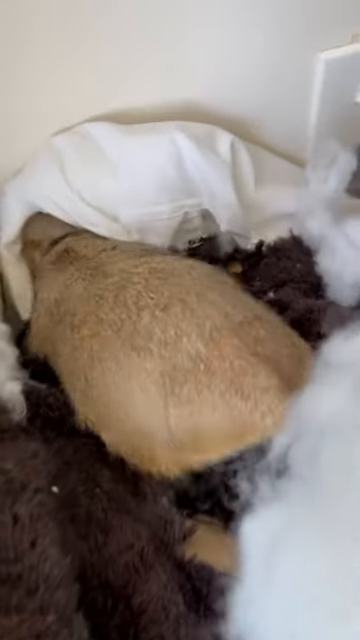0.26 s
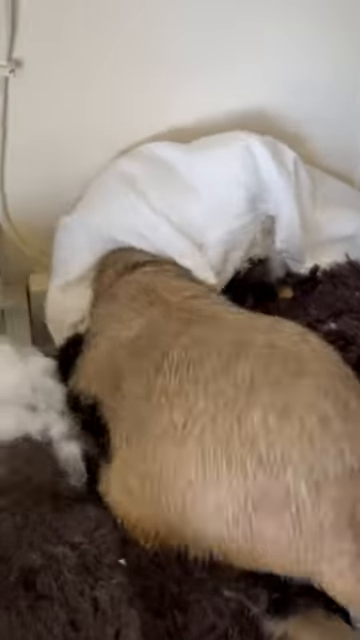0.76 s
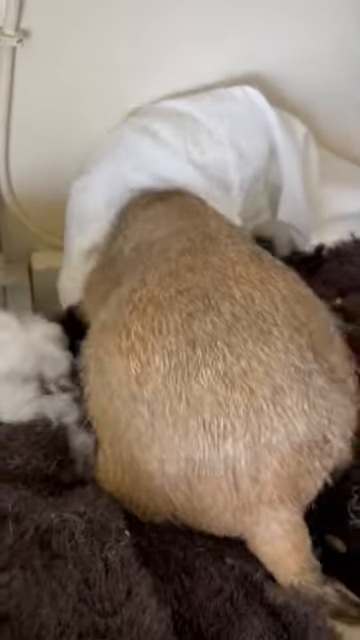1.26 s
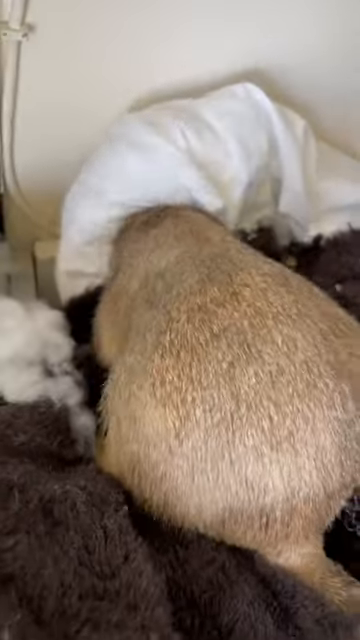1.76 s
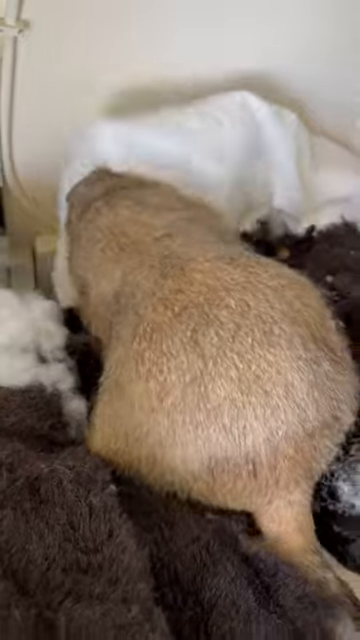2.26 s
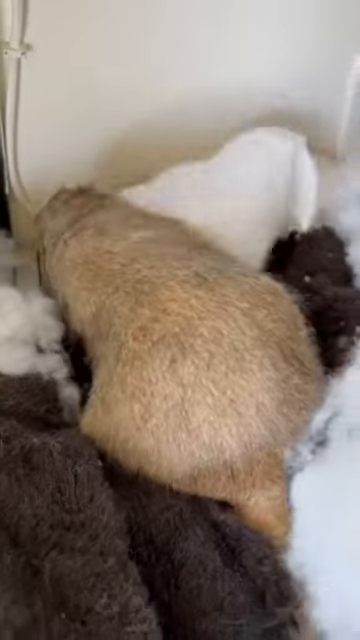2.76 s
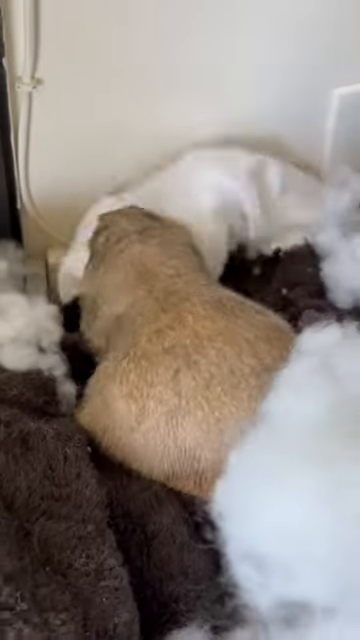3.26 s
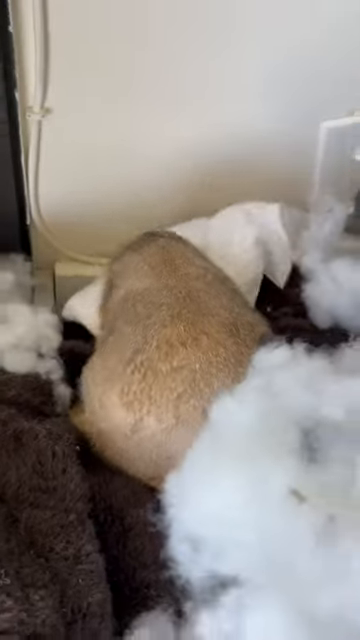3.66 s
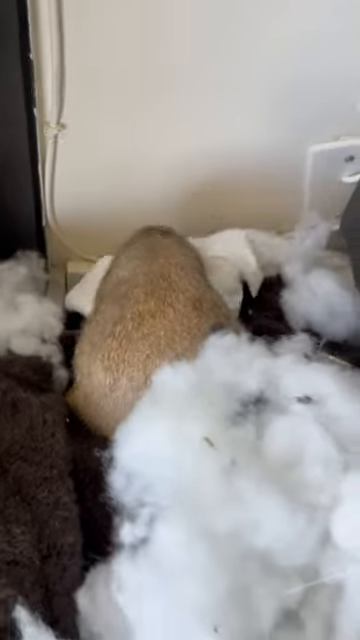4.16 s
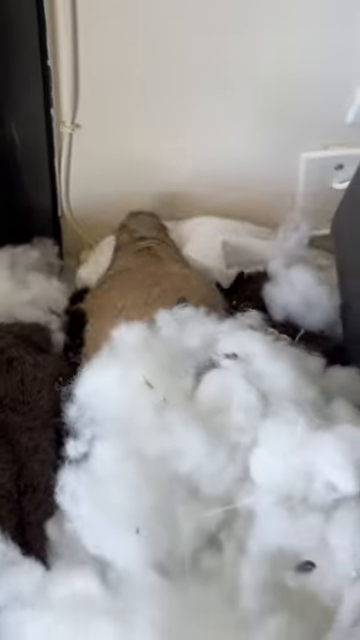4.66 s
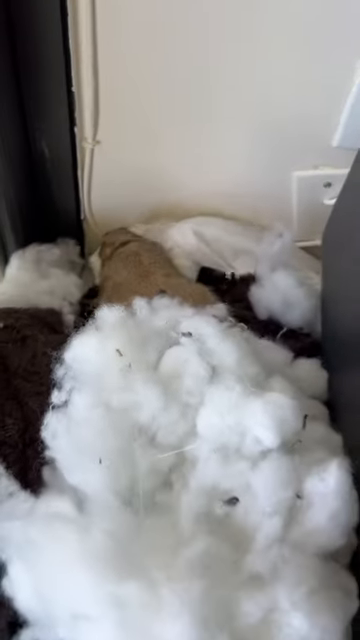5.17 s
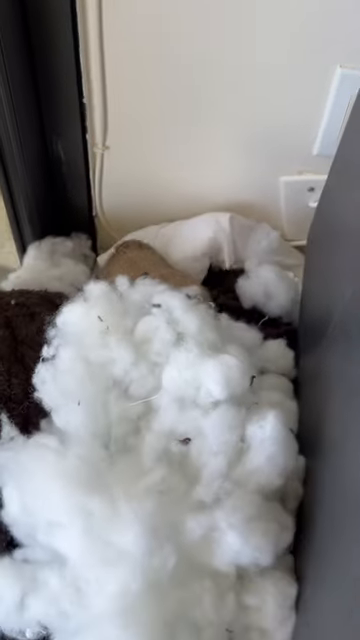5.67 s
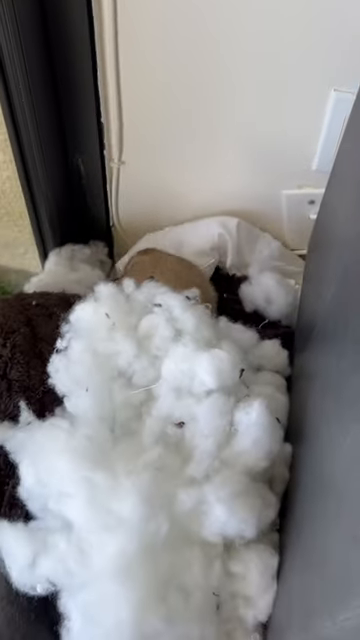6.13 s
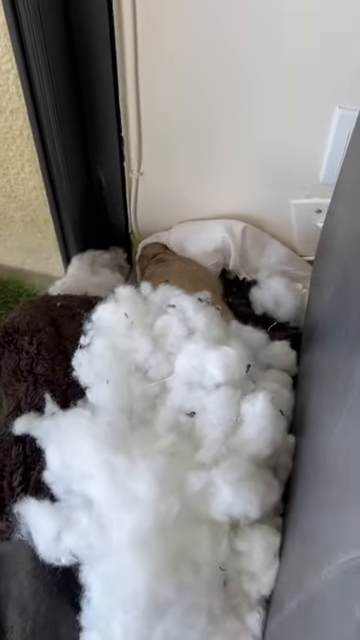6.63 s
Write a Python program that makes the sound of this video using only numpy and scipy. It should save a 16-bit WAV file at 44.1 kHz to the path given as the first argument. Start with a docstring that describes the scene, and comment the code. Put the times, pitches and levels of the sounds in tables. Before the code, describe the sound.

Soft paw thumps and fabric rustles lead into rapid gritty claw scratches, then sparse scrapes, above a steady low household hum.

```python
"""Small rodent digging in towels

A small rodent digs into towels and stuffing in the corner of a room, close to a phone. Claws catch and rip
along the cloth: clicks and gritty noise, shaped stroke by stroke, ring a board below. Paws and the faintest
claw strokes thump the soft pile as filtered pushes; fabric rustles in swells of grainy noise. Household
machines hum in the background as wavering sines over a bed of coloured noise."""
import sys
import numpy as np
from scipy import signal
from scipy.fft import rfft, irfft, next_fast_len
from scipy.io import wavfile
from scipy.ndimage import uniform_filter1d

SR = 44100
rng = np.random.default_rng(int(sys.argv[2]) if len(sys.argv) > 2 else 0)


def generate_wav(signal):
    """Clip the signal to [-1, 1] and save it as 16-bit WAV at the path in sys.argv[1]."""
    frames = np.transpose(np.atleast_2d(signal))
    scaled = np.clip(frames, -1, 1) * 32767
    pcm = np.round(scaled).astype(np.int16)
    wavfile.write(sys.argv[1], SR, pcm)


N = 304290
SIZE = next_fast_len(N + SR // 4)  # transform length, with room for late filter tails
HZ = np.arange(SIZE // 2 + 1) * SR / SIZE


def undb(db):
    """Turn decibels into an amplitude factor."""
    return 10 ** (np.asarray(db) / 20)


def over_hz(points):
    """Join (Hz, value) points on a log-frequency axis."""
    hz, value = np.transpose(points)
    return np.interp(np.log(HZ + 1), np.log(hz + 1), value)


def colour(x, points):
    """Causal minimum-phase filter through (Hz, dB) points that keeps the power of white input."""
    below = (points[0][0] / 2, points[0][1] - 20)
    above = (points[-1][0] * 2, points[-1][1] - 20)
    cepstrum = irfft(np.log(undb(over_hz([below, *points, above]))), SIZE)
    # fold the cepstrum forward in time
    cepstrum[1:SIZE // 2] *= 2
    cepstrum[SIZE // 2 + 1:] = 0
    gain = np.exp(rfft(cepstrum))
    gain_rms = np.sqrt(np.mean(abs(gain) ** 2))
    return irfft(rfft(x, SIZE) * gain / gain_rms, SIZE)[:N]


def walk(rate):
    """Random levels held 1 / rate s and slewed; spread near 1."""
    hold = int(SR / rate)
    levels = np.repeat(rng.standard_normal(N // hold + 1), hold)
    return uniform_filter1d(levels, hold)[:N]


def grit(rate, spread_db, smooth, rarest):
    """Threads snapping loose: uneven clicks over fine friction noise, power 1."""
    timing, sign, size = rng.random((3, N))
    # small draws make the rare loud clicks; rarest caps them
    loudness = undb(-spread_db * np.log(size + rarest))
    clicks = (timing < rate / SR) * np.sign(sign - .5) * loudness
    x = clicks / np.std(clicks) + smooth * rng.standard_normal(N)
    return x / np.std(x)


# colour of the room's rumble and air: pitch_hz, level_db
RUMBLE_COLOUR = [(30, -26.5), (46, 5), (60, 1), (85, 1.5), (120, -7), (170, -14.5), (500, -39.5),
                 (1400, -33.5), (1750, -50), (2400, -53), (4000, -48), (15000, -60)]
RUMBLE_DB = -53


def room_air():
    """Steady rumble and ventilation noise, wavering a little."""
    return undb(RUMBLE_DB + 1.3 * walk(3.5)) * colour(rng.standard_normal(N), RUMBLE_COLOUR)


# weaker steady tones, each fading in over a second: pitch_hz, level_db, fade_start_s
WEAK_TONES = [(54.4, -62, -6), (508, -76, 4)]
# the motor runs a little under the mains line and beats with it
MOTOR_HZ, BUZZ_HZ = 58.36, 119.8
MOTOR_DB, MAINS_DB, BUZZ_DB = -46.5, -56, -50
BEAT_S, BEAT_PEAK_S = 1.02, 3.24
HUM_FADE_DB_S = 1.14  # the buzz slowly fades at this rate, motor and mains half as fast


def hum_line(t, hz, db, phase):
    """One machine line: a sine whose level and phase waver."""
    level = np.sqrt(2) * undb(db + 0.98 * walk(15.0))
    return level * np.sin(2 * np.pi * hz * (t - BEAT_PEAK_S) + 0.5 * walk(4.8) + phase)


def machines():
    """Motor and mains lines beat together, with a rougher buzz and weaker tones beside them."""
    t = np.arange(N) / SR
    fade_db = -HUM_FADE_DB_S * t
    phase = 2 * np.pi * rng.random()
    motor = hum_line(t, MOTOR_HZ, MOTOR_DB + .5 * fade_db, phase)
    mains = hum_line(t, MOTOR_HZ + 1 / BEAT_S, MAINS_DB + .5 * fade_db, phase)
    buzz = hum_line(t, BUZZ_HZ, BUZZ_DB + fade_db + 3.1 * walk(9.1), phase)
    tones = np.zeros(N)
    for hz, db, start in WEAK_TONES:
        tones += np.clip(t - start, 0, 1) * hum_line(t, hz, db, 2 * np.pi * rng.random())
    return motor + mains + buzz + tones


# rubs of cloth under the body: start_s, hold_s, rustle_db, hiss_db
CLOTH_RUBS = [(0.165, 0.063, -58.5, -70.5), (0.339, 0.025, -59, -69.5), (0.485, 0.0092, -66, -73.5),
              (0.534, 0.017, -66, -75), (0.864, 0.038, -62, -70.5), (1.105, 0.068, -66.5, -77.5),
              (1.233, 0.13, -71.5, -82), (1.517, 0.11, -62, -69.5), (1.867, 0.029, -68.5, -79.5),
              (2.118, 0.048, -72.5, -70.5), (2.218, 0.044, -59, -65), (2.444, 0.03, -55, -63.5),
              (2.599, 0.17, -61.5, -70.5), (2.932, 0.063, -55.5, -66), (3.147, 0.091, -64, -71),
              (3.293, 0.054, -54.5, -67), (3.474, 0.024, -47, -55), (3.548, 0.065, -56, -66.5),
              (3.731, 0.014, -55, -62.5), (3.812, 0.19, -50.5, -67), (4.15, .2, -51.5, -65.5),
              (4.444, 0.15, -74.5, -81), (4.672, 0.12, -60.5, -66.5), (5.124, 0.13, -71.5, -81.5),
              (5.421, 0.027, -59, -69.5), (5.493, 0.047, -62.5, -68.5), (5.853, 0.019, -59, -76),
              (5.998, 0.017, -62.5, -77.5), (6.435, 0.052, -64, -77), (6.598, 0.0065, -64, -72),
              (6.756, 0.018, -64.5, -85)]


def rubs(db, rise_db_s, fall_db_s, rest_db):
    """Level of the sliding cloth: each rub swells, holds and dies away over a resting level."""
    t = np.arange(0, N, 32) / SR
    start, hold = np.transpose(CLOTH_RUBS)[:2, :, None]
    before = np.maximum(start - t, 0)
    after = np.maximum(t - start - hold, 0)
    under_db = rise_db_s * before + fall_db_s * after
    power = np.sum(undb(db[:, None] - under_db) ** 2, axis=0) + undb(rest_db) ** 2
    return np.interp(np.arange(N) / SR, t, np.sqrt(power))


# colours of the grainy rustle, the finer hiss, and the low thump of pushed pile: pitch_hz, level_db
RUSTLE_COLOUR = [(150, 4), (300, 5.5), (600, 0.5), (1400, -14), (1850, -12), (2400, -18), (4000, -29)]
HISS_COLOUR = [(1800, -12), (3300, 0), (6000, 0), (11000, -8.5), (15000, -5)]
THUMP_COLOUR = [(40, -8), (62, -16), (88, 4), (160, -0.5), (300, -1.5), (500, -32.5)]


def cloth(shove_db=-1):
    """Fabric slides: a grainy rustle, a finer hiss and a low shove, all flickering together."""
    rustle_db, hiss_db = np.transpose(CLOTH_RUBS)[2:]
    flicker = undb(2.0 * walk(25) + 2.3 * walk(90))
    rustle = flicker * rubs(rustle_db, rise_db_s=188, fall_db_s=180, rest_db=-73.5)
    hiss = flicker * rubs(hiss_db, rise_db_s=262, fall_db_s=252.5, rest_db=-100)
    fibres = grit(rate=700, spread_db=4.5, smooth=0.7, rarest=.03)
    fine_fibres = grit(rate=2300, spread_db=3.0, smooth=1.3, rarest=.01)
    shove = undb(shove_db) * rustle * rng.standard_normal(N)
    return (colour(rustle * fibres, RUSTLE_COLOUR) + colour(hiss * fine_fibres, HISS_COLOUR)
            + colour(shove, THUMP_COLOUR))


BENDING_MS = 2.198  # travel time of a bending wave at 1000 Hz


def bend(x):
    """Bending waves run as the root of frequency: a click arrives as a falling chirp, timed from its treble."""
    khz = HZ / 1000
    turn = np.pi * BENDING_MS * (4 * np.sqrt(khz) - khz)  # no delay at 4 kHz
    return irfft(rfft(x, SIZE) * np.exp(-1j * turn), SIZE)[:N]


# soft paw steps and the faintest claw strokes, each a dull push, before the press boost: start_s, level_db
SOFT_PUSHES = [(0.163, -43), (0.208, -47), (0.23, -41.5), (0.328, -39.5), (0.377, -37.5), (0.42, -44),
               (0.448, -44), (0.493, -40), (0.85, -50.5), (1.138, -41.5), (1.629, -45.5), (1.654, -44),
               (1.88, -46.5), (2.24, -44), (3.545, -37), (4.708, -49), (4.961, -43), (5.371, -45.5),
               (6.004, -46.5), (6.434, -45), (6.499, -49), (6.593, -45)]
# dull colour of a soft push on the pile: pitch_hz, level_db
STEP_COLOUR = [(90, -9), (170, 1.5), (350, -8), (700, -21.5), (1500, -31)]


def steps(press_db=20):
    """Paws set down on the pile, and the faintest claw strokes land softly: one dull push each."""
    push = np.zeros(N)
    for s, db in SOFT_PUSHES:
        push[int(s * SR)] = undb(db + press_db)
    return bend(colour(push, STEP_COLOUR))


# claw strokes, last three relative to level_db: start_s, length_ms, level_db, thump_db, rasp_db, fizz_db
CLAW_STROKES = [(0.347, 3, -51.5, 0, -9.5, -9), (0.554, 7.9, -56.5, 14, -12, -2),
                (1.515, 9.4, -51, -2, -14, -17), (1.531, 5.2, -36.5, 3.5, -15, -18),
                (2.441, 2, -49, 0.5, -38, -35), (2.468, 18, -52, 7, -44, -16),
                (2.64, 2.8, -51.5, 2.5, -25, -30), (2.724, 11, -43.5, 5.5, -35, -16.5),
                (2.934, 9, -44, 5, -15.5, -20), (2.9678, 3.6, -25, -2.5, -20, -16.5),
                (2.981, 2.8, -37, -15.5, -16, -13.5), (3.301, 6, -53.5, 18.5, -9.5, -16),
                (3.338, 12, -52, 5.5, -30.5, -31), (3.357, 8, -61, 2.5, -4, -15.5),
                (3.3772, 1.8, -51.5, 3, -14.5, -16.5), (3.3956, 2.6, -37, -17.5, -49, -39.5),
                (3.437, 3.1, -37.5, 3.5, -9.5, -10), (3.4593, 9.5, -27, 0.5, -8, -16),
                (3.474, 16, -40.5, -0.5, -2.5, -29), (3.492, 7.6, -38.5, -1.5, -9, -24),
                (3.525, 2.5, -49.5, 18.5, -24, -16.5), (3.5894, 2.8, -37, 8.5, -21, -15),
                (3.6323, 2.9, -35, -2.5, -47, -31), (3.6511, 8, -33, -4, -20, -31.5),
                (3.6593, 1.5, -37.5, -0.5, 2, -25), (3.668, 1.3, -36, -3, -20, -30),
                (3.68, 2.2, -26.5, -5.5, -22, -17.5), (3.687, 1.7, -42, 4, 2.5, -9),
                (3.7161, 23.4, -27.5, -8.5, -15, -25), (3.7225, 1.5, -27.5, 1.5, -9, -28.5),
                (3.781, 14.4, -35, -4.5, -9, -22.5), (3.816, 21, -41, 2, -14, -19),
                (3.851, 10.4, -42.5, -0.5, -23.5, -28), (3.914, 0.85, -27, 0.5, -22, -26.5),
                (3.921, 7, -29, 4.5, -19.5, -26), (3.9616, 2, -33, -5.5, -15, -25.5),
                (4.0104, 15.9, -29, 2, -10.5, -11.5), (4.0321, 3.5, -24, -11.5, -18.5, -23.5),
                (4.0427, 2.8, -29, -16.5, -18, -22), (4.051, 30, -43.5, -2.5, -9, -13.5),
                (4.08, 16, -38.5, 0, -15, -18.5), (4.106, 1.9, -30.5, -12.5, -19, -20.5),
                (4.145, 4, -31, -3.5, -9.5, -13), (4.155, 12.5, -34, 5, -6, -17),
                (4.2453, 1.1, -36.5, -12, -24, -19.5), (4.257, 22, -58, 4, 1, -8.5),
                (4.2844, 26.6, -35.5, 5, -4.5, -11), (4.2919, 1.7, -24, -18.5, -9, -14.5),
                (4.311, 68, -50.5, -2, -6, -17), (4.365, 11, -45.5, 3.5, -38, -20),
                (4.8, 2.5, -54.5, 17.5, -14, -17), (4.8145, 3.8, -54, -11, -23, -20),
                (4.972, 6, -57.5, -3, -29, -36), (5.463, 2.4, -39.5, 4, -13, -17),
                (5.4785, 22, -37, -4, -7, -7), (5.8682, 3, -43.5, -12.5, -11, -12.5),
                (6.75, 3.3, -56.5, 13, -15, -19)]
STROKE_MS = np.arange(SR // 8) * 1000 / SR  # time axis of one stroke
# modes of the board under the cloth, which rings briefly: pitch_hz, width_hz, level_db
BOARD_MODES = [(544, 160, -8.5), (1118, 230, -13), (1400, 180, -12), (2010, 88, -8), (2388, 88, -10),
               (3490, 40, -12), (4800, 83, -5.5)]


def board(force, spot_db=5, dull=1.0, wander_db=3, detune=0.1):
    """Claw force rings the board's resonances; every stroke lands on another spot."""
    ring = np.zeros(N + len(STROKE_MS))
    starts = [int(row[0] * SR) for row in CLAW_STROKES] + [N]
    # the modes shift and wake unevenly from stroke to stroke
    chance = 2 * rng.random((len(CLAW_STROKES), len(BOARD_MODES), 2)) - 1
    wander = [undb(wander_db * walk(80)) for _ in BOARD_MODES]
    height = np.linspace(0, 1, len(BOARD_MODES))
    for row, start, stop, luck in zip(CLAW_STROKES, starts, starts[1:], chance):
        stop = min(stop, start + len(STROKE_MS))
        for (hz, width, db), (loud, shift), high, sway in zip(BOARD_MODES, luck, height, wander):
            hz = hz * np.exp(detune * shift)
            push = np.pad(force[start:stop] * sway[start:stop], (0, SR // 50))
            rung = signal.lfilter(*signal.iirpeak(hz, hz / width, SR), push)
            # a stroke with little rasp is dull and spares the high modes
            mode_db = db + spot_db * loud + dull * row[4] * high
            ring[start:start + len(rung)] += undb(mode_db) * np.sqrt(SR / np.pi / width) * rung
    return ring[:N]


def threads():
    """Fine threads snapping under a claw, unsteady in level."""
    return grit(rate=1800, spread_db=2.0, smooth=0.32, rarest=.003) * undb(2.3 * walk(330))


# claw colours, from the low scrape up through rasp and fizz to the top sizzle: pitch_hz, level_db
SCRAPE_COLOUR = [(150, 2), (300, 8), (600, -0.5), (1000, -3), (1520, -8), (1850, -13.5), (2200, -12),
                 (3000, -17.5), (4500, -29)]
RASP_COLOUR = [(2000, -28.5), (3600, 4.5), (4800, -2.5), (5600, -15)]
FIZZ_COLOUR = [(5600, -5.5), (8000, -1.5), (10000, -8)]
SIZZLE_COLOUR = [(10500, -10), (12500, -5), (15000, 10)]


def claws(rise=0.086, tap_ms=8, sag_db=4, fall_ms=3.17, tail_db=-20, tail_ms=12, push_ms=6,
          bite_db=20.5, knock_db=24, sizzle_db=-4, bite_lost=0.65, knock_lost=0.4):
    """Each stroke bites with a click, sags while the claw drags, lets go and leaves a soft tail."""
    ms = STROKE_MS
    scrape, rasp, fizz, thump, bite, knock = np.zeros((6, N + len(ms)))
    for s, length, db, thump_db, rasp_db, fizz_db in CLAW_STROKES:
        start = int(s * SR)
        at = slice(start, start + len(ms))
        after = np.maximum(ms - length, 0)
        attack = 1 - np.exp(-ms / (rise * length + 0.37))
        drag = undb(-sag_db * np.minimum(ms / length, 1)) * np.exp(-after / fall_ms)
        tail = undb(tail_db) * np.exp(-after / tail_ms)
        shape = attack * (drag + tail)
        # a short tap is nearly all click; a long drag is mostly friction
        drags = min(length / tap_ms, 1)
        scrape[at] += drags * undb(db) * shape
        rasp[at] += undb(db + rasp_db) * shape
        fizz[at] += undb(db + fizz_db) * shape
        thump[at] += drags * undb(db + thump_db) * np.exp(-after / push_ms)
        knock[start] += (1 - knock_lost * drags) * undb(db + thump_db + knock_db)
        bite[start] += (1 - bite_lost * drags) * undb(db + bite_db)
    slips = grit(rate=700, spread_db=4.0, smooth=0.48, rarest=0.024) * undb(2.0 * walk(300))
    force = scrape[:N] * slips + bite[:N]
    scraping = bend(colour(force, SCRAPE_COLOUR) + board(force))
    rasping = colour(rasp[:N] * threads(), RASP_COLOUR)
    fizzing = colour(fizz[:N] * threads(), FIZZ_COLOUR)
    sizzling = undb(sizzle_db) * colour(np.sqrt(rasp * fizz)[:N] * threads(), SIZZLE_COLOUR)
    thumping = bend(colour(thump[:N] * slips + knock[:N], THUMP_COLOUR))
    return scraping + rasping + fizzing + sizzling + thumping


ROOM_DB, ROOM_T60_S, ROOM_TREBLE_T60_S = -24, 0.72, 0.25


def room(x):
    """Walls answer each scratch with a faint tail, different left and right; the treble dies first."""
    t = np.arange(SR // 2) / SR
    low, high = rng.standard_normal((2, 2, len(t)))
    low = signal.sosfilt(signal.butter(2, [500, 3500], "band", fs=SR, output="sos"), low)
    tail = low * undb(-60 * t / ROOM_T60_S) + .5 * high * undb(-60 * t / ROOM_TREBLE_T60_S)
    tail = tail / np.linalg.norm(tail[0])
    return undb(ROOM_DB) * signal.fftconvolve(x[None], tail, axes=1)[:, :N]


# phase of left channel against right, climbing unevenly with frequency: pitch_hz, phase_rad
STEREO_PHASE = [(0, 0), (170, -.08), (520, -.2), (900, -.8), (1500, .2), (2330, 1.7), (4820, 2.0),
                (6200, 4.0), (6980, 6.1), (8180, 6.5), (9650, 9.3), (10900, 9.6), (11800, 12.5),
                (13400, 12.8), (14200, 15.5), (16100, 15.9)]
# level of left channel against right: pitch_hz, balance_db
BALANCE = [(60, 0), (200, .4), (380, 2), (750, 7), (1300, 4), (2100, 5), (3300, -2), (4700, -5), (6000, 0),
           (15000, 0)]
# strength of the sound that differs between the channels: pitch_hz, share (0-1)
DIFFUSE_SHARE = [(60, .0), (200, .03), (1400, .16), (2800, .42), (4000, .36), (7000, .22), (15000, .22)]


def scene():
    """All layers reach both channels; a diffuse share, drawn independently, widens the stereo."""
    digging = claws() + steps()
    direct = rfft(digging + cloth() + room_air() + machines(), SIZE)
    # fresh draws of claws, cloth and air, added on the left and subtracted on the right
    diffuse = over_hz(DIFFUSE_SHARE) * rfft(claws() + cloth() + room_air(), SIZE)
    hz, phase = np.transpose(STEREO_PHASE)
    # each channel takes half of the level and phase difference
    half = undb(over_hz(BALANCE) / 2) * np.exp(.5j * np.interp(HZ, hz, phase))
    channels = np.array([(direct + diffuse) * half, (direct - diffuse) / half])
    return irfft(channels, SIZE)[:, :N] + room(digging)


FADE_OUT_S, TOP_HZ = 0.042, 16300


def record(dry):
    """The sound sinks at the very end; the phone cuts the top with a steep low-pass."""
    fade = np.clip((N - np.arange(N)) / SR / FADE_OUT_S, .15, 1)
    return signal.sosfilt(signal.ellip(10, .2, 70, TOP_HZ, fs=SR, output="sos"), fade * dry)


dry = scene()
out = record(dry)
generate_wav(out)
```